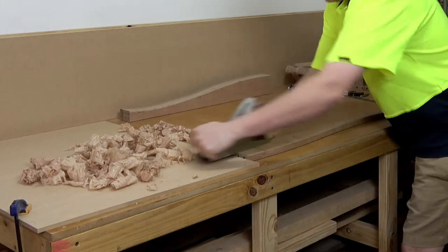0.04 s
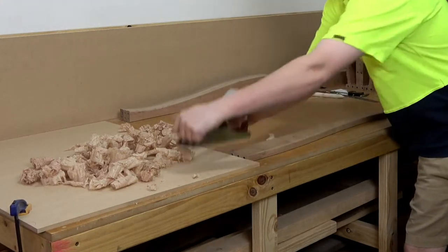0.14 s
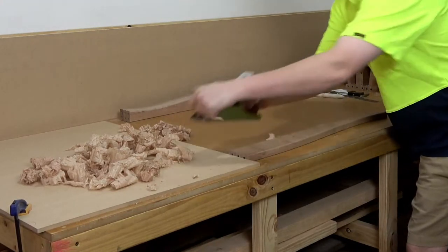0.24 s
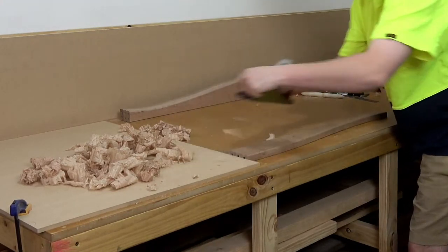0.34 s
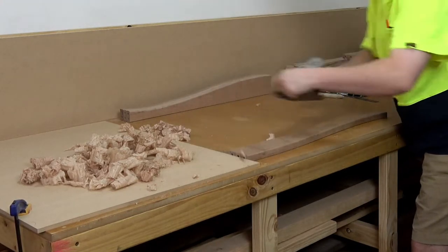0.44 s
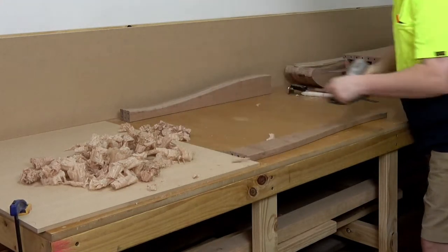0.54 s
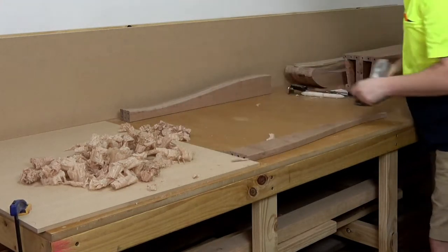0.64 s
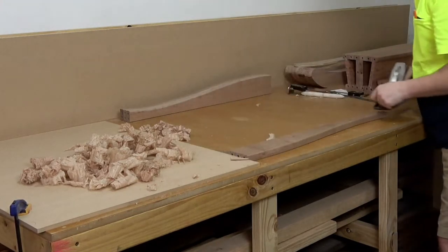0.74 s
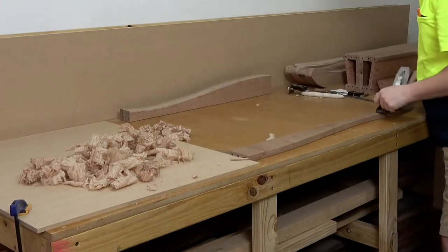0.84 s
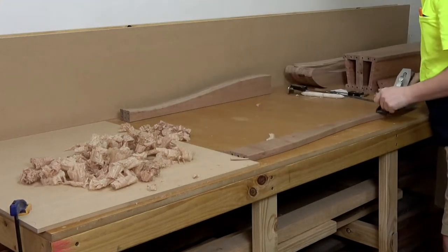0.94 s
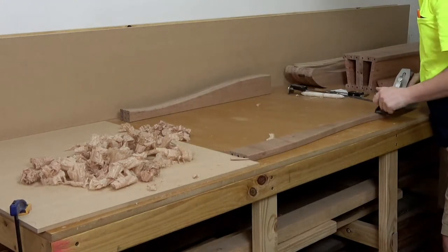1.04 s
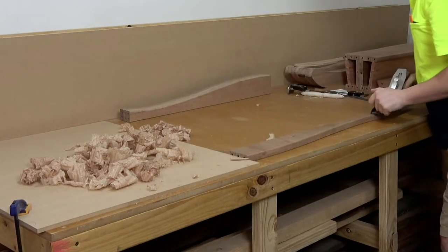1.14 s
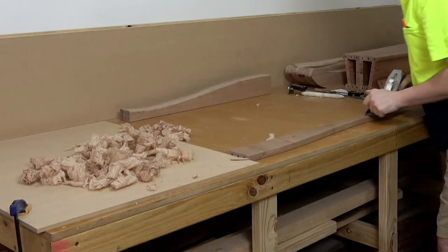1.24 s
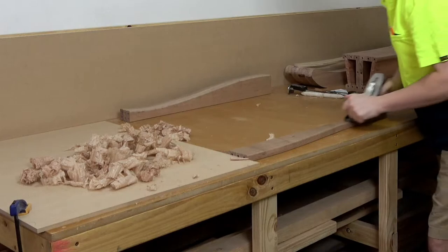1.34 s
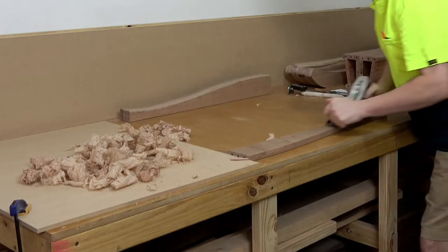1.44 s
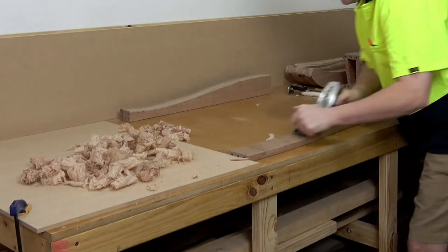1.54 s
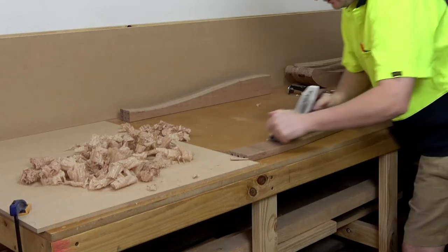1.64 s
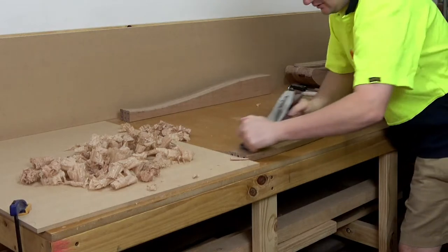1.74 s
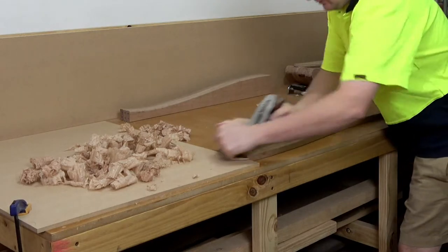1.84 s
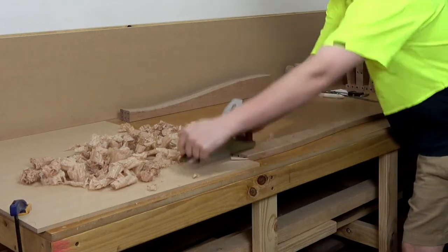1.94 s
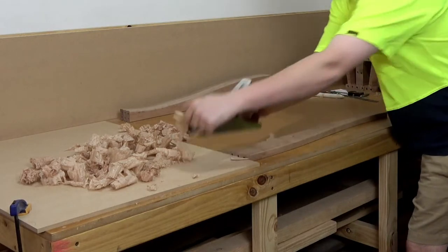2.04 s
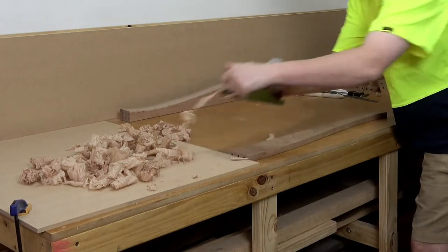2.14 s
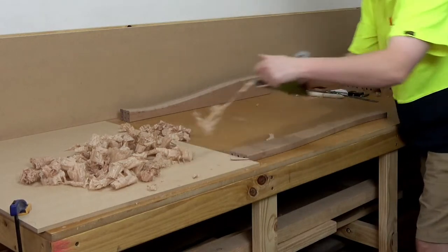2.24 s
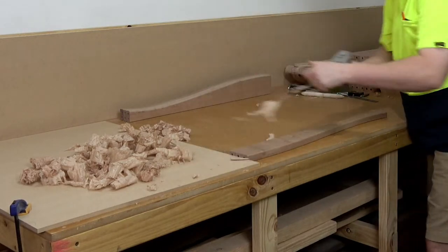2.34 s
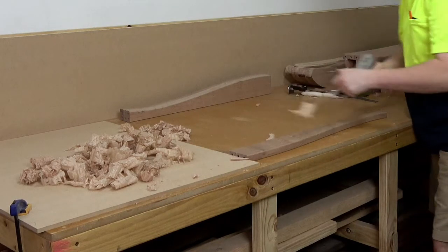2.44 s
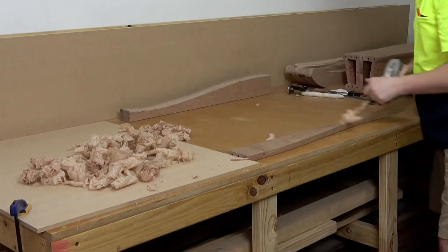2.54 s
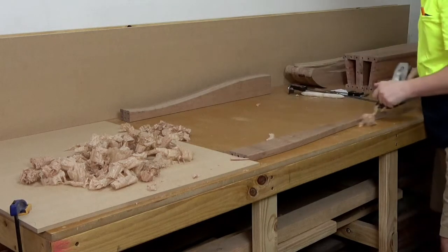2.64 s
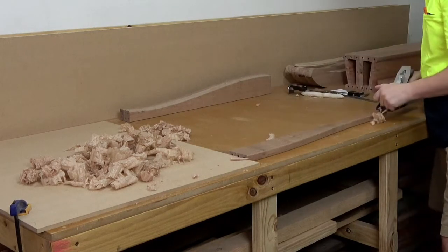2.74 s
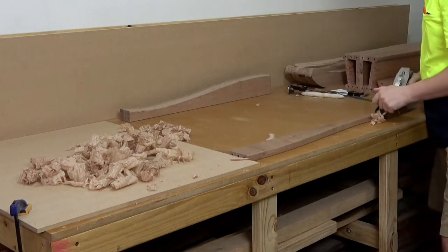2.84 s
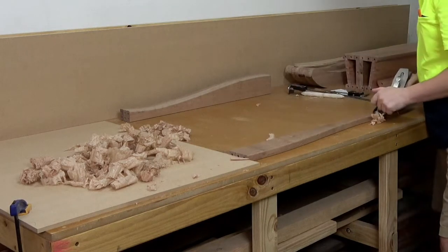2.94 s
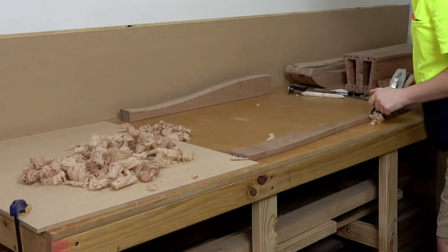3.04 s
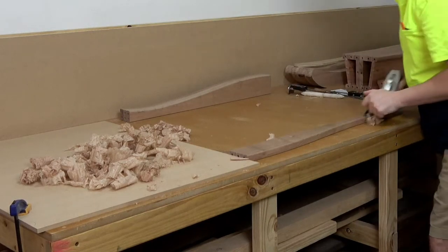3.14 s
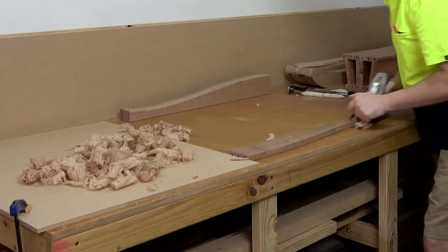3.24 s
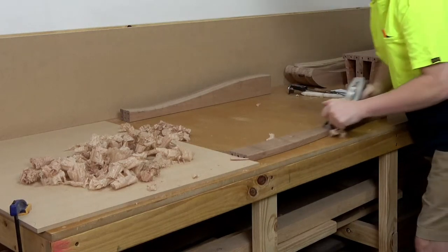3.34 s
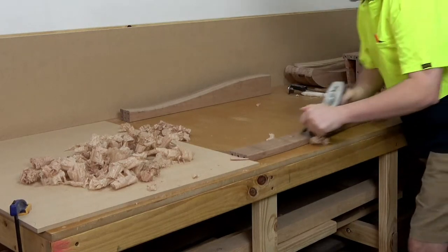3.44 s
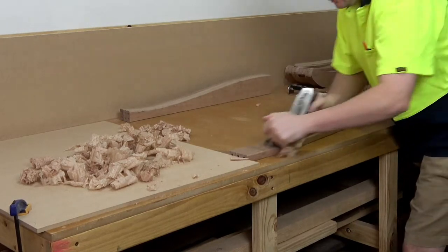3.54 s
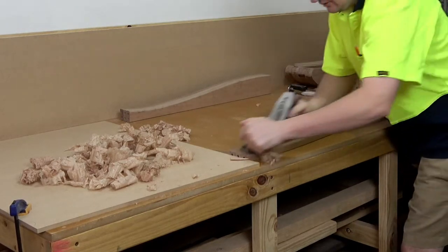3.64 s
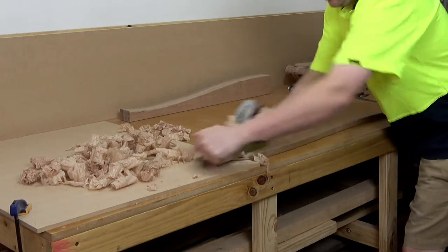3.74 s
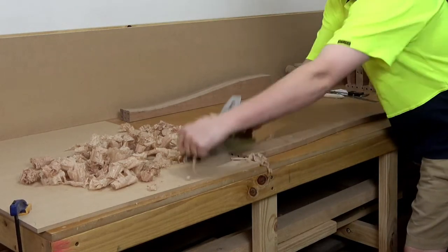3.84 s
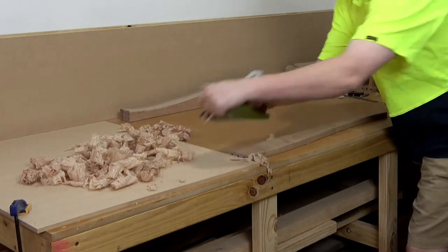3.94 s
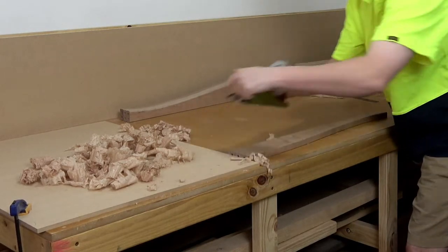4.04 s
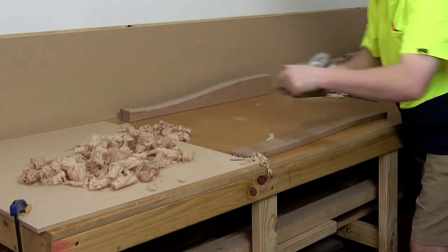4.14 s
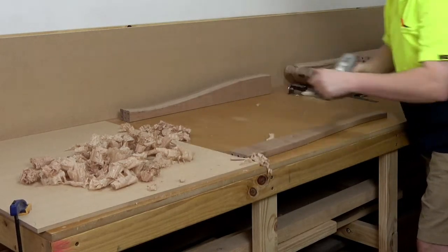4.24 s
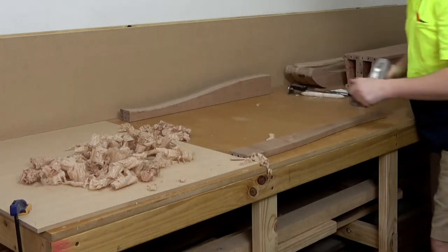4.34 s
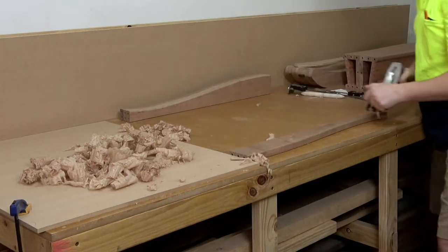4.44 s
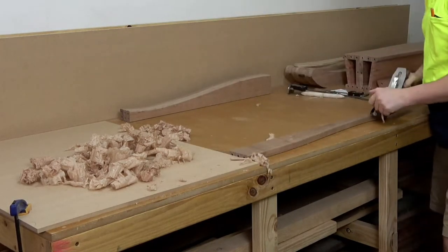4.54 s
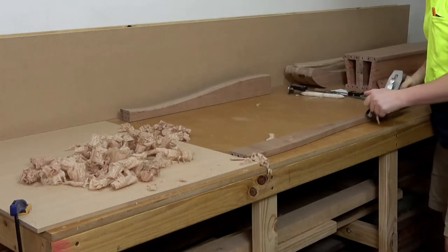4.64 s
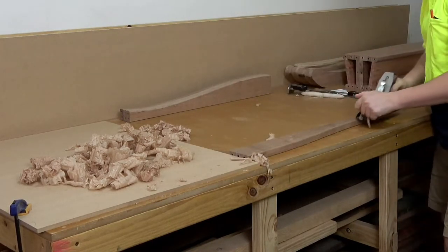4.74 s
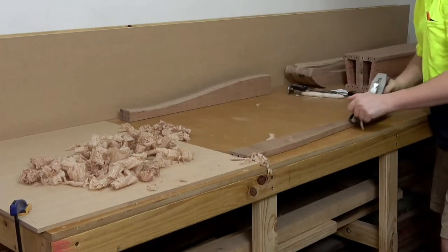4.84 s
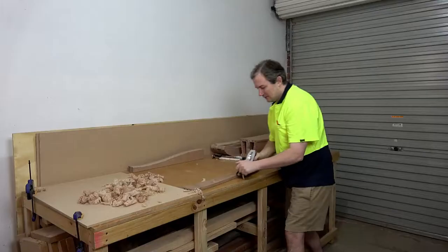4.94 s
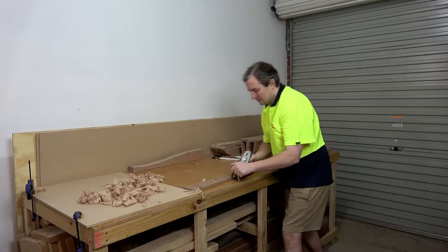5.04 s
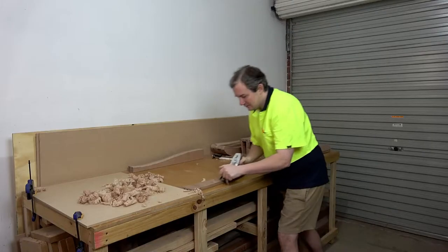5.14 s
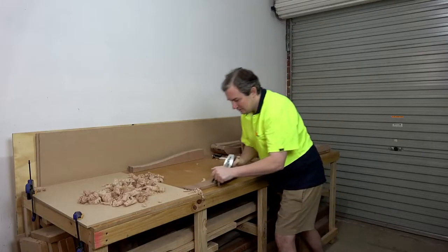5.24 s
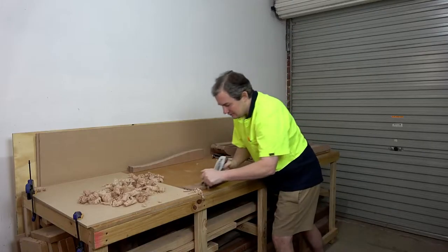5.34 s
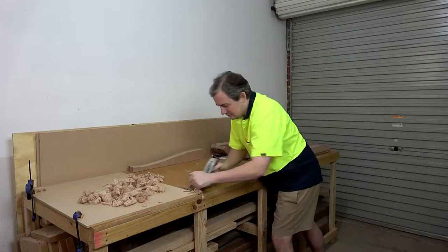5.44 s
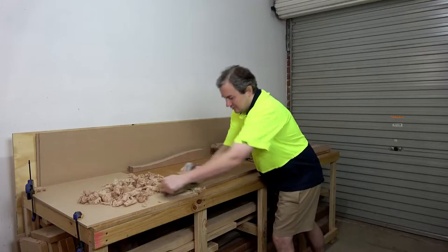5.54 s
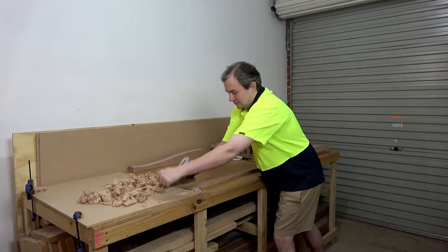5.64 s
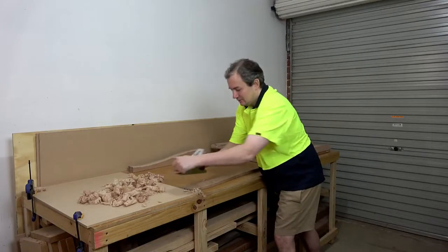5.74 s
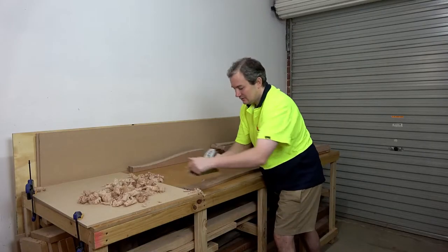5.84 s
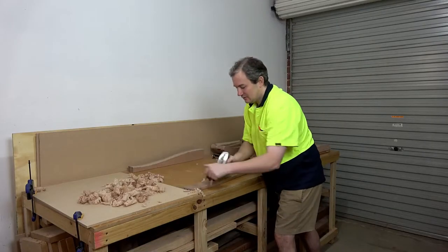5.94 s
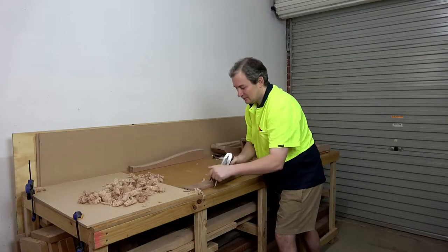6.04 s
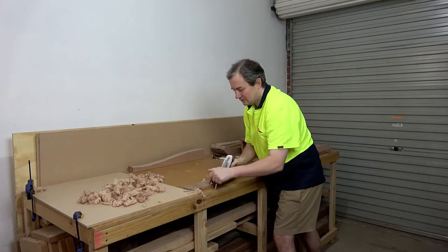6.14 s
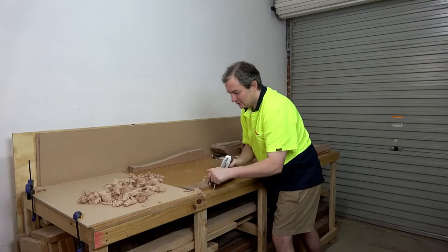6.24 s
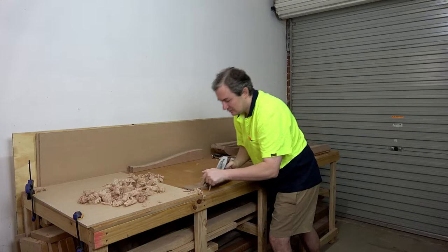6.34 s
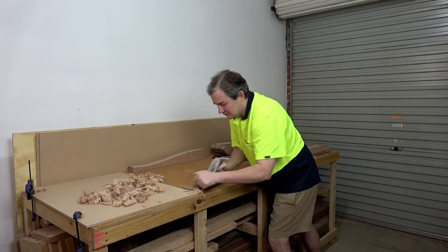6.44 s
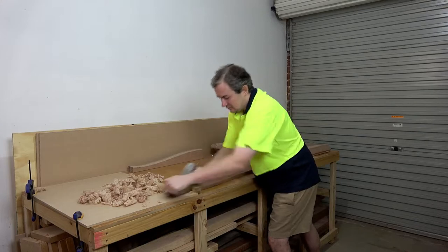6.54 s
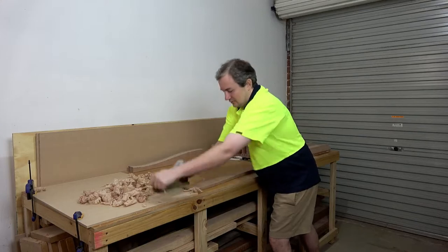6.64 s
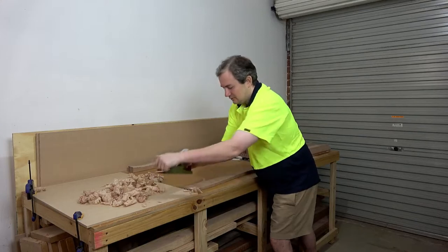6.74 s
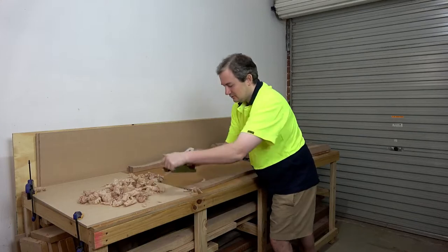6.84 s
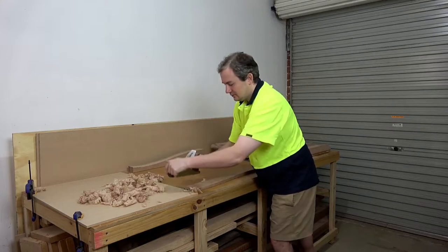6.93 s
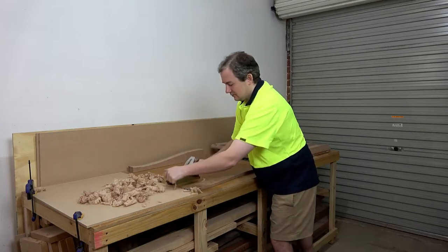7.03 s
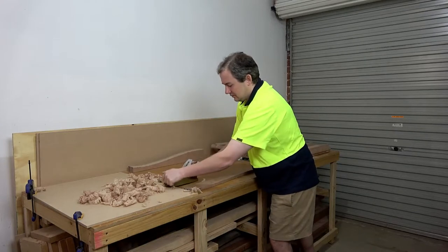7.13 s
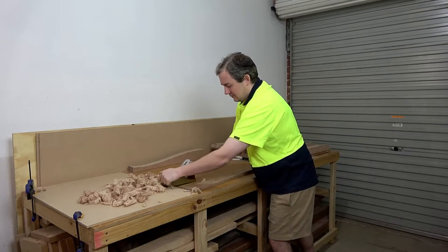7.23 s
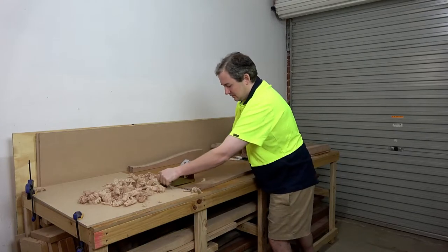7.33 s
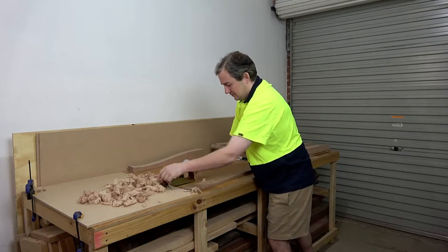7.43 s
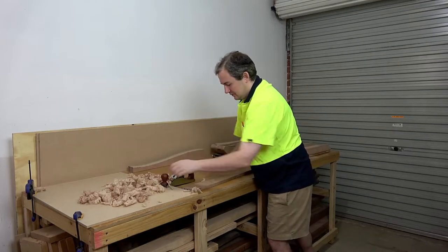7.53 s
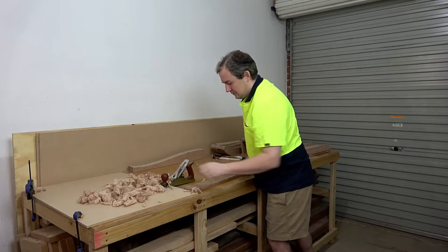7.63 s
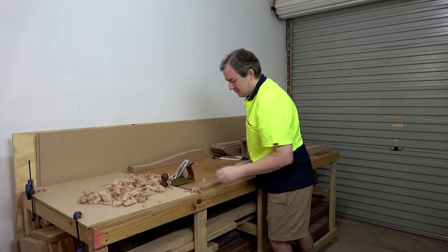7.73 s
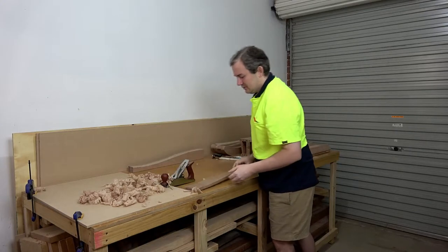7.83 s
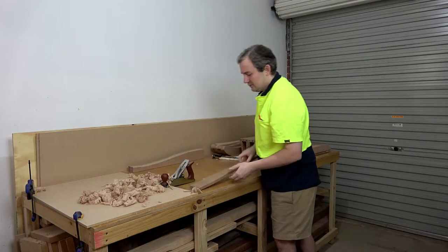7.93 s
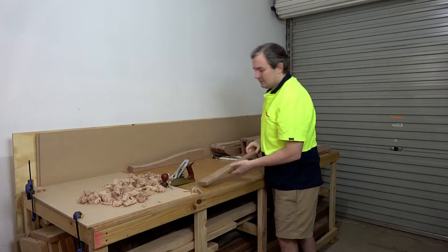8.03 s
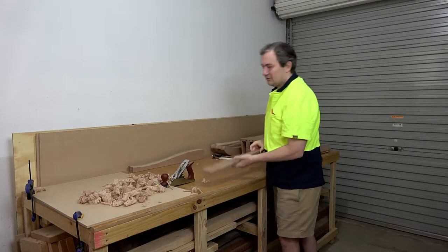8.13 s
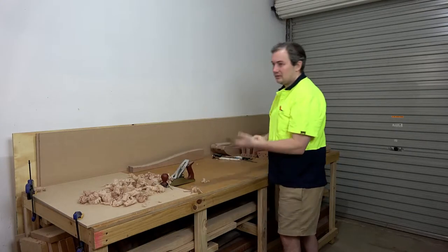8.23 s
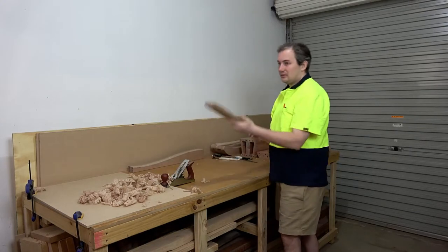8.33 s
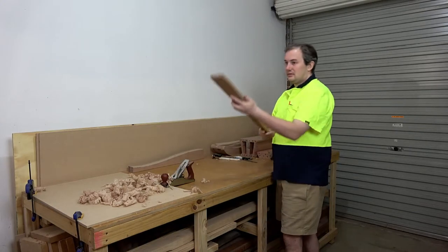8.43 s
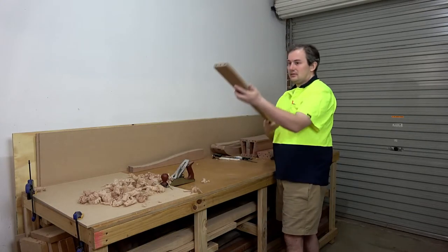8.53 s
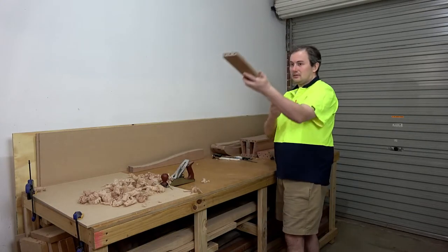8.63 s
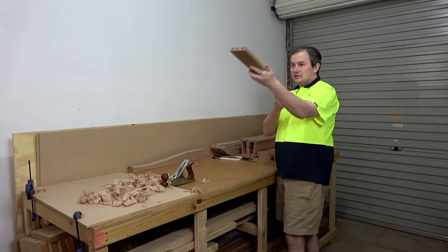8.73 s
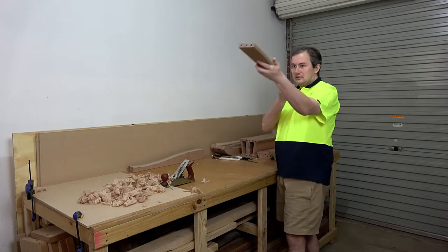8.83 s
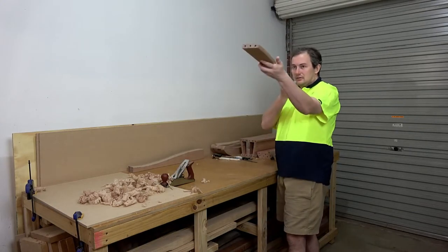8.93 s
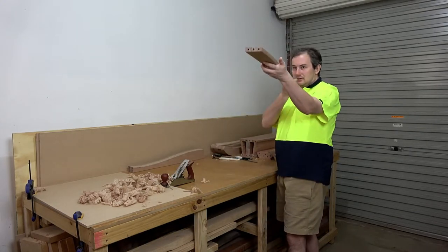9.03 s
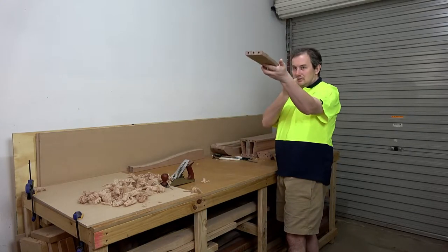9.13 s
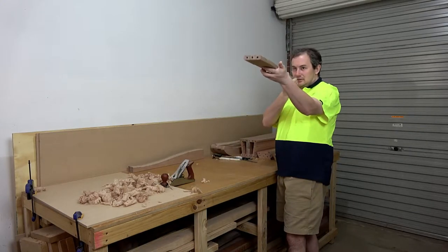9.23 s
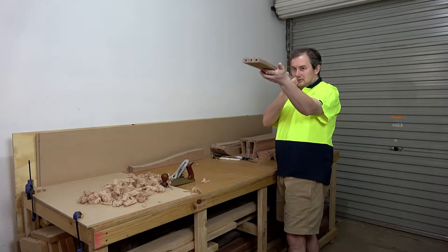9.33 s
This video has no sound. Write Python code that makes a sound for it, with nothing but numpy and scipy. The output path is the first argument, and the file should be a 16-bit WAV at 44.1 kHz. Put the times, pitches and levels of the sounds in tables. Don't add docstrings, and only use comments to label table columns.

```python
import sys
import numpy as np
from scipy import signal
from scipy.fft import rfft, irfft, next_fast_len
from scipy.io import wavfile

SR = 44100
rng = np.random.default_rng(int(sys.argv[2]) if len(sys.argv) > 2 else 0)


def boost(x):
    u = np.asarray(x, float) / 20
    return 10 ** u


def generate_wav(sig):
    pcm = np.round(np.clip(np.atleast_2d(sig).T, -1, 1) * 32767).astype(np.int16)
    wavfile.write(sys.argv[1], SR, pcm)


N = 413640
TIME = np.arange(N) / SR
SLOW = TIME[::64]


def rms_one(x):
    return x / np.sqrt(np.mean(x ** 2) + 1e-20)


def at_hz(points, hz):
    points_hz, values = np.transpose(points)
    return np.interp(np.log(hz + 1), np.log(points_hz), values)


def coloured(x, spectrum):
    size = next_fast_len(N)
    gain = boost(at_hz(spectrum, np.fft.rfftfreq(size, 1 / SR)))
    return rms_one(irfft(rfft(x, size) * gain, size)[:N])


def drift(rate_hz):
    r = np.exp(-80 * np.pi * rate_hz / SR)
    noise = rng.standard_normal(N // 40 + 2002)
    slow = signal.lfilter([1], [1, -2 * r, r * r], noise)[2000:]
    return np.interp(np.arange(N) / 40, np.arange(len(slow)), rms_one(slow))


def resonate(x, hz, width_hz):
    r = np.exp(-np.pi * width_hz / SR)
    poles = [1, -2 * r * np.cos(2 * np.pi * hz / SR), r * r]
    return rms_one(signal.lfilter([1, 0, -1], poles, x))


def butter(x, order, hz, kind):
    return signal.sosfilt(signal.butter(order, hz, kind, fs=SR, output="sos"), x)


def gate(t, start_s, stop_s, fade_s):
    return np.clip(np.minimum(t - start_s, stop_s - t) / fade_s, 0, 1)


def background():
    # (f/Hz, level/dB)
    hum_tones = [(64.6, -57), (102.3, -51.5), (129.2, -75.5), (193.8, -63), (296.1, -61)]
    # (f/Hz, density/dB per Hz)
    floor_spectrum = [(18, -32), (30, -14), (103, -5.5), (156, -1), (188, -14), (250, -5), (352, -14.5),
                      (594, -11), (677, -14.5), (1300, -18), (6440, -31), (14100, -33), (15700, -33)]
    floor_db = -47
    hums = np.zeros(N)
    for hz, db in hum_tones:
        level = boost(db - 1.0 + 2.1 * drift(2.0))
        phase = 2 * np.pi * np.cumsum(hz + 0.553 * drift(1.4)) / SR
        hums += level * np.sin(phase)
    return hums + boost(floor_db - 5.0) * coloured(rng.standard_normal(N), floor_spectrum)


def engine():
    # (t/s, firing f/Hz)
    speed = [(0, 40.6), (.4, 42.5), (.65, 42.8), (.9, 41.5), (2.1, 54.3), (2.8, 60.13), (3.9, 71.3),
             (4.6, 77.24), (5.7, 82.96), (6.1, 85.7), (6.5, 86)]
    orders_db = [-48, -46.5, -51.5, -53.5, -55, -60]
    # (f/Hz, width/Hz, level/dB)
    door_modes = [(59.8, 3.7, 4.5), (76.5, 19, 0), (111, 18, -9), (167, 13, 1.5), (214, 13, -6.5),
                  (299, 34, 1.5)]
    gone_s = 6.45
    firing_hz = np.interp(TIME, *np.transpose(speed))
    phase = 2 * np.pi * np.cumsum(firing_hz * (1 + 0.0019 * drift(3.15))) / SR
    orders = np.zeros(N)
    for k, db in enumerate(orders_db, 1):
        passed = 0
        for mode_hz, width_hz, mode_db in door_modes:
            detune = 2 * (k * firing_hz[::64] - mode_hz) / width_hz
            passed = passed + boost(mode_db) ** 2 / (1 + detune ** 2)
        swell = np.interp(TIME, SLOW, np.sqrt(passed))
        orders += boost(db + 2.5 * drift(3.2)) * swell * np.sin(k * phase)
    return np.sqrt(2) * orders * gate(TIME, -1, gone_s, 0.28)


def birds():
    # (t/s, length/s, start f/Hz, end f/Hz, level/dB)
    chirps = [(8.43, 0.035, 6800, 6350, -53), (8.468, 0.044, 6800, 5800, -48), (8.5, .035, 6650, 5950, -48),
              (8.64, 0.032, 6850, 6350, -57), (8.707, .055, 6740, 5730, -54), (8.88, .03, 6600, 6100, -59),
              (8.905, .04, 6050, 5830, -53), (8.937, 0.044, 6300, 6000, -54),
              (8.69, 0.044, 3700, 3100, -55), (8.73, 0.038, 2000, 1650, -60), (8.962, .05, 2550, 2530, -59),
              (9.144, 0.023, 3740, 3600, -50), (9.148, .05, 3030, 2872, -58),
              (9.225, .035, 2490, 2420, -58)]
    out, quaver = np.zeros(N), drift(119)
    for s, length_s, start_hz, end_hz, db in chirps:
        span = slice(round(s * SR), round((s + length_s) * SR))
        t = TIME[span] - s
        glide_hz = start_hz + (end_hz - start_hz) * t / length_s
        phase = 2 * np.pi * np.cumsum(glide_hz * (1 + 0.017 * quaver[span])) / SR
        out[span] += boost(db) * gate(t, 0, length_s, 0.011) * np.sin(phase)
    return out


def fingers():
    # (f/Hz, width/Hz, level/dB, start t/s, stop t/s)
    rub_tones = [(1650, 20, -58, 8.57, 8.66), (1786, 30, -61, 8.72, 8.85), (2340, 26, -60, 8.38, 8.5),
                 (2310, 27, -66, 8.72, 8.85), (3270, 50, -63, 8.42, 8.62), (3940, 220, -62.5, 8.55, 9.2),
                 (3150, 120, -62, 8.6, 8.74), (4830, 60, -68, 8.76, 8.87), (1753, 38, -38, 7.86, 7.95),
                 (1910, 110, -35.5, 7.94, 8.05), (2620, 110, -40, 7.94, 8.05), (365, 28, -45, 7.84, 8.06),
                 (408, 38, -44.5, 7.63, 7.71), (98, 10, -34, 6.2, 6.42), (96, 120, -32, 7.14, 7.33)]
    out, skin, slip_db = np.zeros(N), rng.standard_normal(N), 1.3 * drift(30)
    for hz, width_hz, db, start_s, stop_s in rub_tones:
        span = slice(round(start_s * SR), round(stop_s * SR))
        tone = resonate(resonate(skin[span], hz, 1.4 * width_hz), hz, 1.4 * width_hz)
        level = boost(db + 1.0 + slip_db[span])
        out[span] += level * gate(TIME[span], start_s, stop_s, 0.03) * tone
    return out


def crack(db, contact_hz):
    toe, tick = np.zeros((2, SR // 40))
    toe[[0, 45, 90]] = 1.5, -.8, .7
    tick[[135, 160, 250]] = .8, -1, .3
    dull = butter(toe, 2, [500, 2.0 * contact_hz], "band")
    bright = butter(tick, 2, [1200, 3.13 * contact_hz], "band")
    return boost(db) * (boost(14.5) * dull + boost(18.0) * bright)


def blows():
    # (t/s, thump level/dB, crack level/dB, clatter level/dB, rocking time/s)
    landings = [(0.036, -27, -42, -37, 0.046), (0.887, -16, -1.5, -17.5, 0.07),
                (1.113, -22, -42, -41, 0.017), (1.895, -24, -17, -26, 0.034), (2.8705, -18.5, 1, -16, 0.16),
                (2.95, -25.5, -30, -23, 0.069), (3.735, -32.5, -36, -51, 0.018),
                (4.716, -23, -8.5, -37.5, 0.022), (4.919, -14, 5, -23, 0.065), (5.54, -33, -38, -57, 0.025),
                (6.171, -11, 4, -29, 0.051), (6.28, -28, -40, -41, 0.058), (6.541, -32, -37, -40, 0.043),
                (7.133, -25, -25, -26, 0.0042), (7.143, -12, -5, -20.5, 0.098), (7.237, -19, 0, -35, 0.08),
                (7.648, -41, -36, -50, 0.013), (7.919, -33, -41.5, -35.5, 0.067),
                (7.965, -30.5, -40, -34, 0.014), (1.13, -18.5, -44, -39, 0.011),
                (1.158, -19.5, -48, -46, .014)]
    # (f/Hz, level/dB, t60/s)
    bench_modes = [(147.7, -8, 0.031), (199, -11, 0.07), (250, -5.5, 0.075), (305, -6, 0.041),
                   (382.5, 2.5, 0.041), (463, -2.5, 0.041), (508, -6, 0.04), (647, 7, 0.011),
                   (852, 11.5, 0.0079), (1010, -0.5, 0.012), (1290, -10, 0.048)]
    # (f/Hz, density/dB per Hz)
    clatter_spectrum = [(300, -34), (700, -8.5), (1300, -1), (2200, -3), (3000, -8.5), (4000, -9),
                        (5200, -22.5), (9000, -38.5), (15000, -53)]
    base_contact_hz, db_per_octave = 1064, 13.5
    thump_share = 0.91
    thump, snap, clatter = np.zeros((3, N + SR))
    t = np.arange(SR // 4) / SR
    for s, thump_db, crack_db, clatter_db, rock_s in landings:
        push, shake = rng.standard_normal((2, len(t)))
        rocking = boost(-4.0 * t / rock_s - 60 * np.maximum(t - rock_s, 0) / 0.12)
        hardness_octaves = (clatter_db - thump_db) / db_per_octave
        contact_hz = np.clip(base_contact_hz * 2 ** hardness_octaves, 450, 1500)
        pushes = push * (rocking + 1.67 * boost(-60 * t / 0.028))
        soft = butter(pushes, 2, min(thump_share * contact_hz, 750), "low")
        at = round(s * SR)
        thump[at:at + len(t)] += boost(thump_db) * soft
        clatter[at:at + len(t)] += boost(clatter_db) * shake * (rocking + 2.86 * boost(-60 * t / 0.081))
        snap[at:at + SR // 40] += crack(crack_db, contact_hz)
    bench = np.zeros(N + SR)
    for hz, db, t60_s in bench_modes:
        r, w = boost(-60 / (t60_s * SR)), 2 * np.pi * hz / SR
        poles = [1, -2 * r * np.cos(w), r * r]
        bench += signal.lfilter([0, boost(db) * np.sin(w)], poles, thump + 1e-18)
    bench = butter(bench + 1e-9 * rng.standard_normal(N + SR), 4, 125, "high")
    colour = boost(at_hz(clatter_spectrum, np.fft.rfftfreq(N, 1 / SR)))
    loose = irfft(rfft(clatter[:N]) * colour, N)
    return boost(-29) * bench[:N] + boost(4.0) * loose, snap[:N]


def fibres(per_s, spread_db):
    sizes = boost(spread_db * np.minimum(rng.exponential(1, N), 4)) * rng.choice([-1, 1], N)
    return sizes * (rng.random(N) < per_s / SR)


def ringing(modes, spectrum, ring_db):
    snaps = fibres(9000, 1.27)
    rung = np.zeros(N)
    for hz, width_hz, db in modes:
        level = boost(db + 3 * drift(10) + 2.5 * drift(60))
        rung += level * resonate(snaps, hz, width_hz)
    direct = coloured(fibres(9000, 1.3), spectrum)
    return rms_one(direct + boost(ring_db) * rung)


def contact():
    # (bite t/s, full cut t/s, lift-off t/s, cut level/dB, edge ring gained in run-out/dB)
    strokes = [
        (-.4, -.3, 0.048, -23.5, 5.5),
        (1.165, 1.223, 1.903, -22.5, 3.5),
        (3.034, 3.24, 3.755, -23, 6),
        (5.064, 5.232, 5.533, -22.5, 8),
        (6.303, 6.436, 6.54, -24, 7.5),
    ]
    # (peak t/s, level/dB, swell/dB per s, fade/dB per s, hiss re rustle/dB)
    rustles = [(.46, -39.5, 87.5, 19.5, -8), (2.25, -38.5, 163, 21.5, -8.5), (2.885, -27.5, 1500, 60, -34),
               (2.975, -31, 164, 87, -33), (4.18, -39.5, 108.5, 22.5, -8), (4.96, -50.5, 600, 100, 4),
               (5.75, -46, 92, 94, -9), (6.2, -52, 500, 120, 5), (7.15, -49.5, 900, 50, 3.5),
               (6.07, -46, 75, 128, -10), (6.75, -43, 42, 36, -7.5), (7.657, -44, 900, 150, -8),
               (7.79, -43.5, 150, 100, -18), (7.91, -33.5, 141, 50, -19), (8.011, -32, 103, 205, -9),
               (8.15, -50, 52, 30, -19), (8.39, -41.5, 25.5, 114, -3), (8.6, -50, 70, 90, -6),
               (8.76, -51, 180, 114, -10), (8.94, -57, 90, 58, -7)]
    bite_db, sag_db = 15, 2
    runout_s, runout_db = 0.19, 3
    edge_start_db, edge_gain_db = -0.5, 3
    hiss_start_db, hiss_gain_db, hiss_runout_db = -13.5, 6.5, 10.5
    lift_db_s, trail_db, trail_db_s = 408, -9, 118
    stroke_rumble_db = -11.5
    rustle_edge_db, rustle_rumble_db = 1, -7
    t, total = SLOW, 1e-14
    for start, full, end, db, ring_db in strokes:
        along = np.clip((t - full) / (end - full), 0, 1)
        runout = np.clip(1 - (end - t) / runout_s, 0, 1)
        after = np.maximum(t - end, 0)
        swell_db = bite_db * np.minimum(t - full, 0) / (full - start) - lift_db_s * np.maximum(start - t, 0)
        stop_db = np.maximum(-lift_db_s * after, trail_db - trail_db_s * after)
        cut_db = db + swell_db - sag_db * along - runout_db * runout + stop_db
        edge_db = edge_start_db + edge_gain_db * along + ring_db * runout
        hiss_db = hiss_start_db + hiss_gain_db * along + hiss_runout_db * runout
        offsets_db = np.array([0 * t, edge_db, hiss_db, stroke_rumble_db + 0 * t])
        total = total + boost(cut_db + offsets_db) ** 2
    for s, db, swell_db_s, fade_db_s, hiss_db in rustles:
        rustle_db = db - swell_db_s * np.maximum(s - t, 0) - fade_db_s * np.maximum(t - s, 0)
        offsets_db = np.array([[0], [rustle_edge_db], [hiss_db], [rustle_rumble_db]])
        total = total + boost(rustle_db + offsets_db) ** 2
    return [np.interp(TIME, t, 10 * np.log10(p)) for p in total]


def plane():
    # (f/Hz, density/dB per Hz)
    cut_spectrum = [(560, -30), (950, -7), (1490, -2), (1750, -3), (2000, -1.5), (2510, -2), (3100, -6.5),
                    (4030, -32), (6820, -120)]
    edge_spectrum = [(1760, -40), (3000, -3.5), (4140, -1), (4870, -7), (6000, -13), (7800, -18),
                     (13200, -120)]
    fibre_spectrum = [(3240, -9.5), (5500, -4), (8020, -3), (9480, -4), (12600, -12.5), (15000, -13),
                      (15700, -36)]
    rumble_spectrum = [(76, -38), (130, 1.5), (252, -3), (304, -2), (390, 2), (558, -8.5), (644, -5.5),
                       (1100, -3), (1430, -9), (2420, -120)]
    # (f/Hz, width/Hz, level/dB)
    body_modes = [(1503, 56, -20), (1970, 186, -2), (2247, 34, -10.5), (2770, 41, -8.5)]
    iron_modes = [(3600, 130, -9), (3907, 117, -4), (4150, 150, -11)]
    # (t/s, level/dB, swell and fade/dB per s)
    knot_hits = [
        (1.53, -20, 95),
        (3.36, -34, 70),
        (3.55, -29.5, 62),
        (5.45, -32.5, 74),
    ]
    cut_db, edge_db, hiss_db, rumble_db = contact()
    grain = drift(8)
    bite_db = np.clip(0.25 * (cut_db + 20.5), -9, 0)
    cut = ringing(body_modes, cut_spectrum, bite_db - 3.5) * boost(cut_db + 1.1 * grain)
    edge = ringing(iron_modes, edge_spectrum, bite_db + 1.0)
    edge *= boost(edge_db + 0.7 * grain + 0.9 * drift(7))
    hiss = coloured(fibres(12000, 3.0), fibre_spectrum)
    hiss *= boost(hiss_db + 0.37 * grain + 0.49 * drift(32))
    rumble = coloured(fibres(3000, 1.9), rumble_spectrum) * boost(rumble_db + 2.0 + 1.75 * drift(9.4))
    knot_level = sum(boost(db - db_s * abs(SLOW - s)) for s, db, db_s in knot_hits)
    knots = resonate(fibres(1500, 2.0), 435, 240) * np.interp(TIME, SLOW, knot_level)
    return boost(-3.0) * (cut + edge + hiss + rumble + knots)


def workshop(x):
    # (f/Hz, t60/s)
    walls = [(100, 0.49), (300, 0.47), (1000, 0.6), (4000, 0.66), (9000, 0.37), (16000, 0.12)]
    t, tail = np.arange(SR) / SR, np.zeros(SR)
    edges_hz = 60 * 2 ** np.arange(0, 8.1, .5)
    for low, high in zip(edges_hz, edges_hz[1:]):
        band = butter(rng.standard_normal(SR), 2, [low, high], "band")
        tail += band * boost(-60 * t / at_hz(walls, np.sqrt(low * high)))
    tail *= np.clip(t / 0.011, 0, 1)
    return signal.fftconvolve(x, tail / np.sqrt(np.sum(tail ** 2)))[:N]


def scene():
    slide, (knocks, snap), far = plane(), blows(), birds()
    wet = workshop(boost(-11.5) * slide + boost(-6) * knocks + boost(-14.5) * snap + boost(-9.0) * far)
    mono = slide + knocks + snap + far + wet + engine() + background() + fingers()
    return np.array([mono, mono])


def top_cut(x):
    return signal.sosfilt(signal.butter(12, 16490, fs=SR, output="sos"), x)


def record(dry):
    limit_db, release_db_s, top = -13.5, 170, .69
    level_db = 10 * np.log10(signal.lfilter([.004], [1, -.996], dry[0] ** 2) + 1e-12)
    held_db = np.maximum.accumulate(level_db + release_db_s * TIME) - release_db_s * TIME
    gain_db = signal.lfilter([.01], [1, -.99], np.minimum(limit_db - held_db, 0))
    capped = np.clip(dry * boost(gain_db), -top, top)
    lowpass = signal.cheby2(18, 50, 16150, fs=SR, output="sos")
    mix = signal.sosfilt(lowpass, capped)
    return top_cut(mix)


dry = scene()
out = record(dry)
generate_wav(out)
```